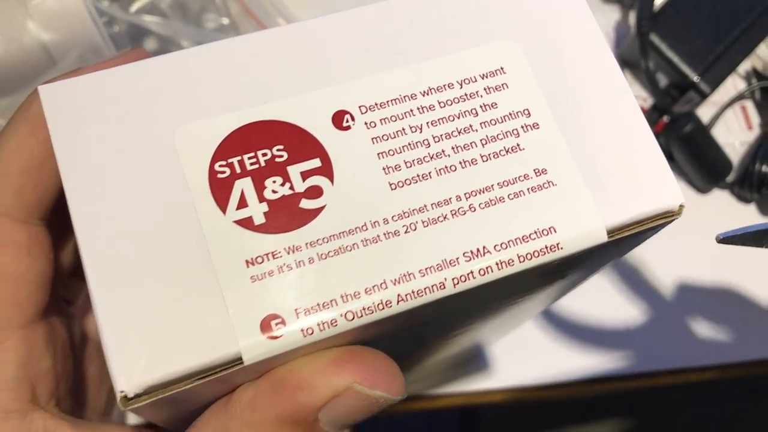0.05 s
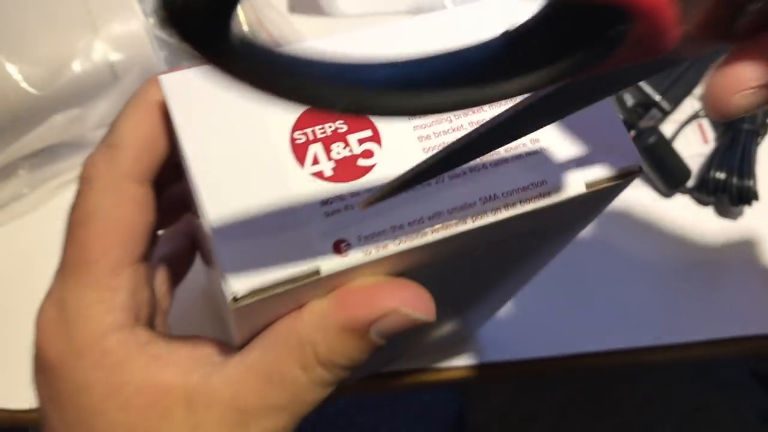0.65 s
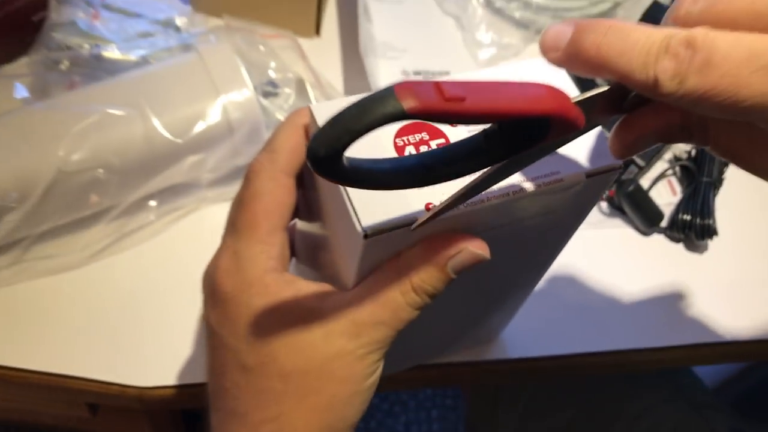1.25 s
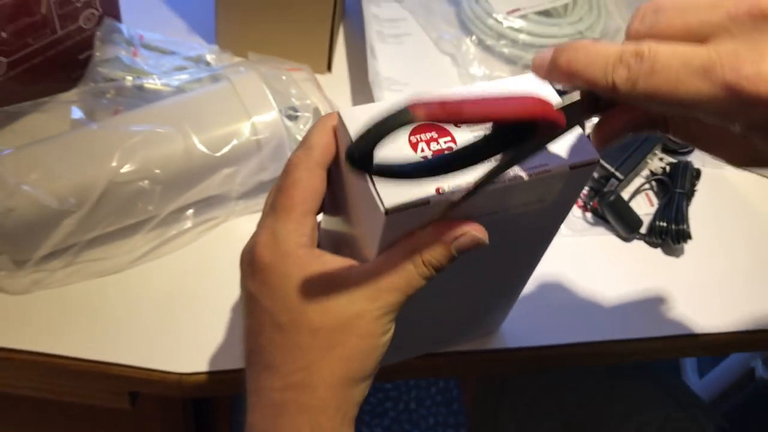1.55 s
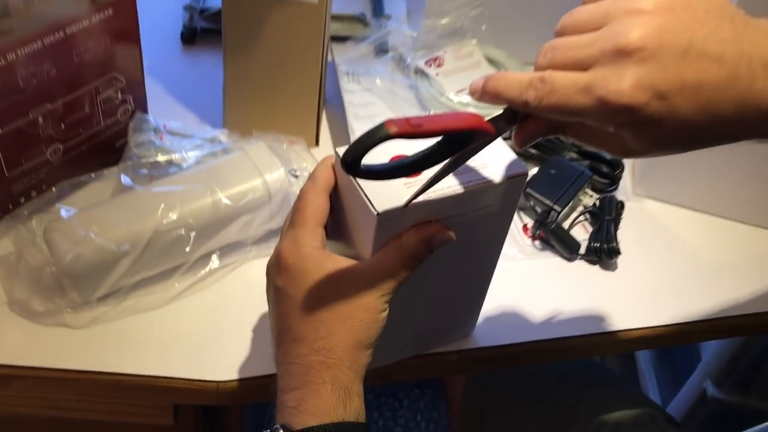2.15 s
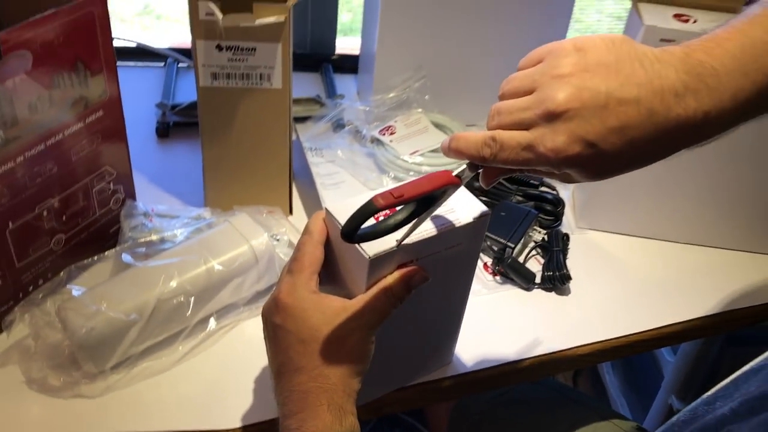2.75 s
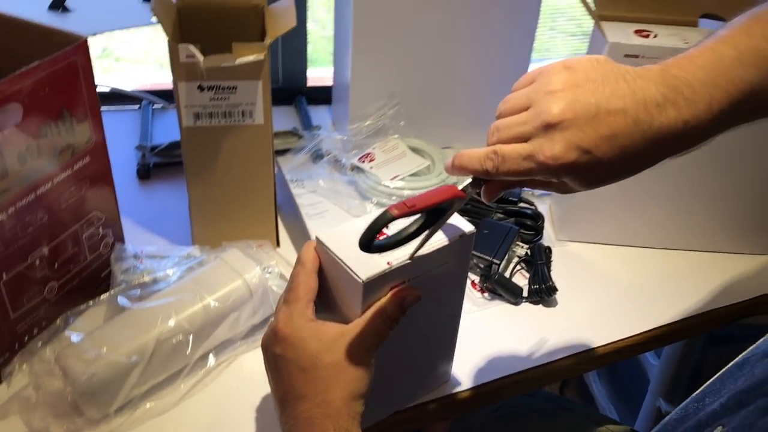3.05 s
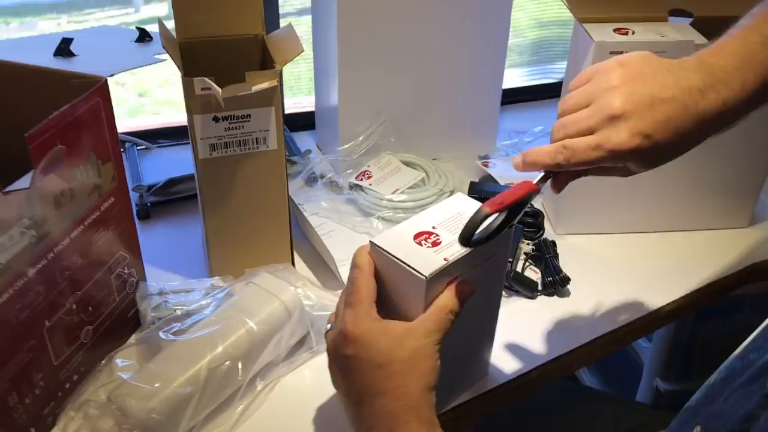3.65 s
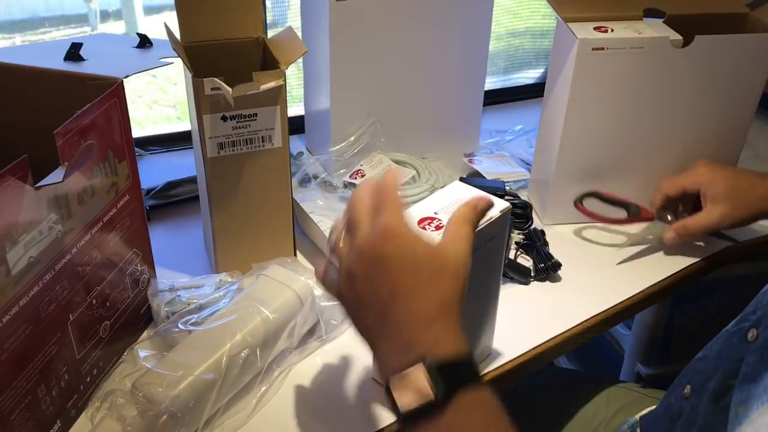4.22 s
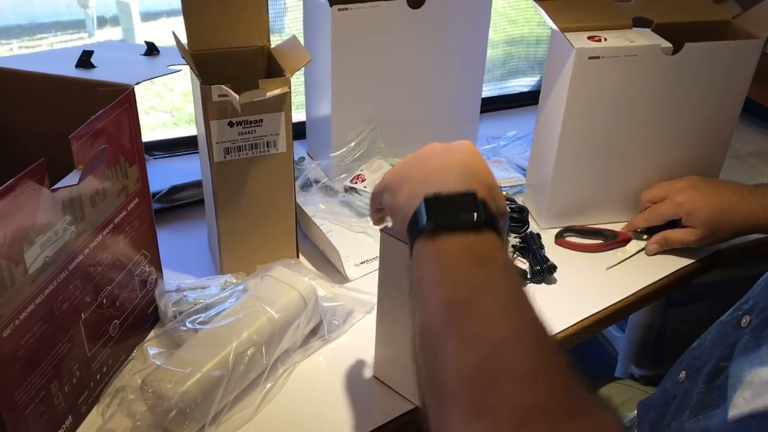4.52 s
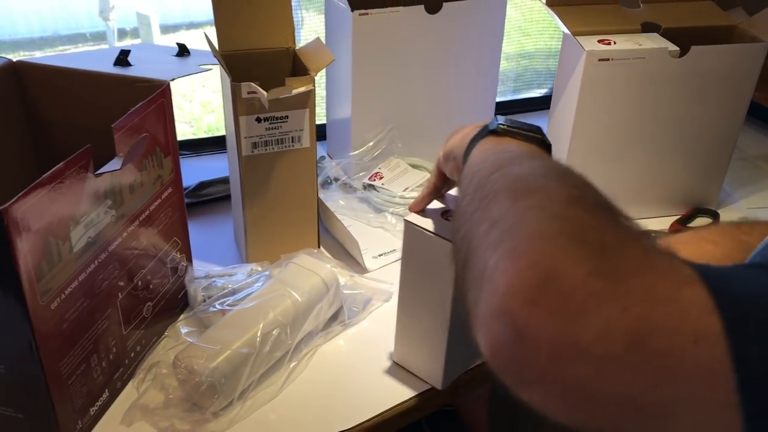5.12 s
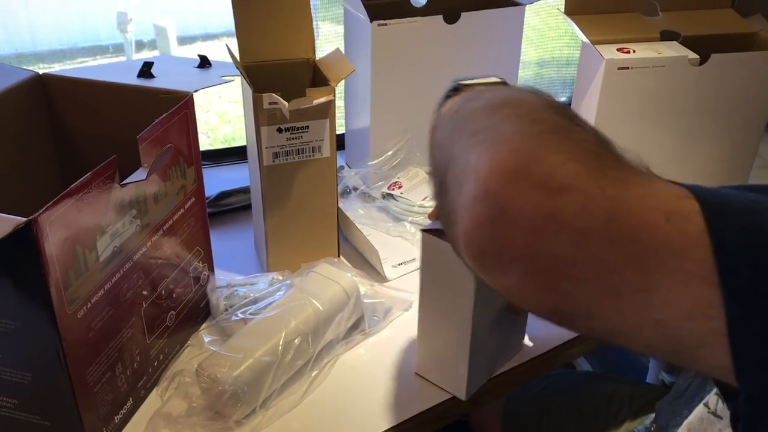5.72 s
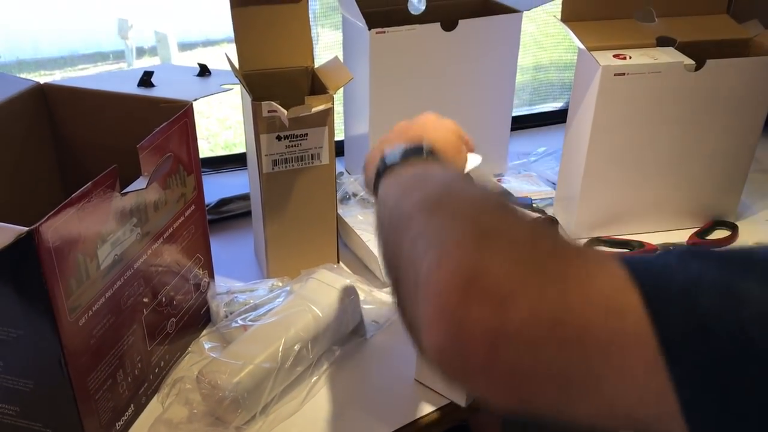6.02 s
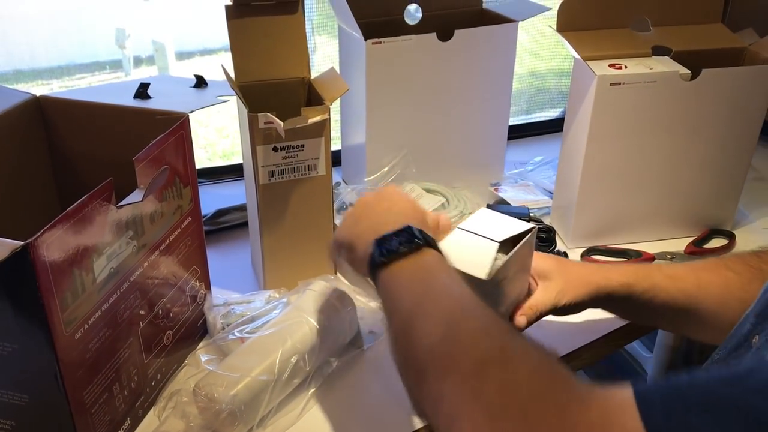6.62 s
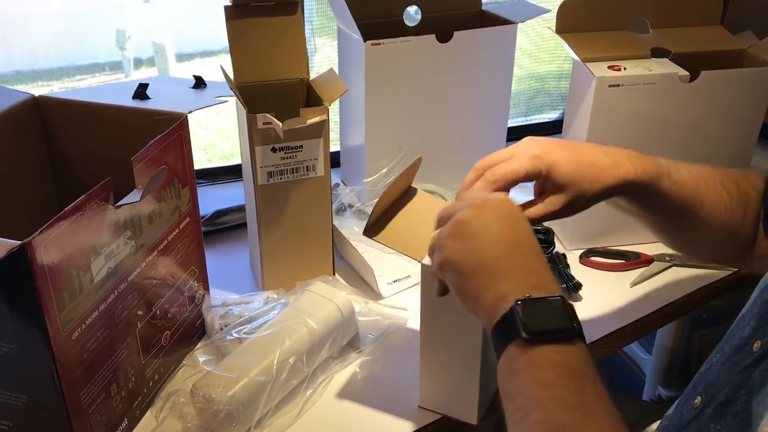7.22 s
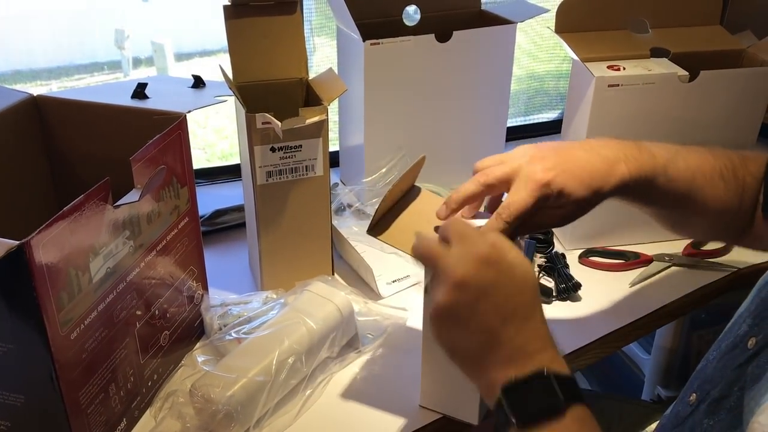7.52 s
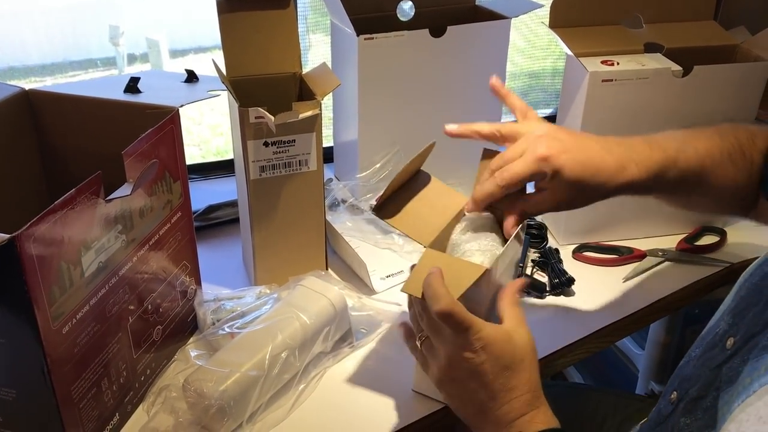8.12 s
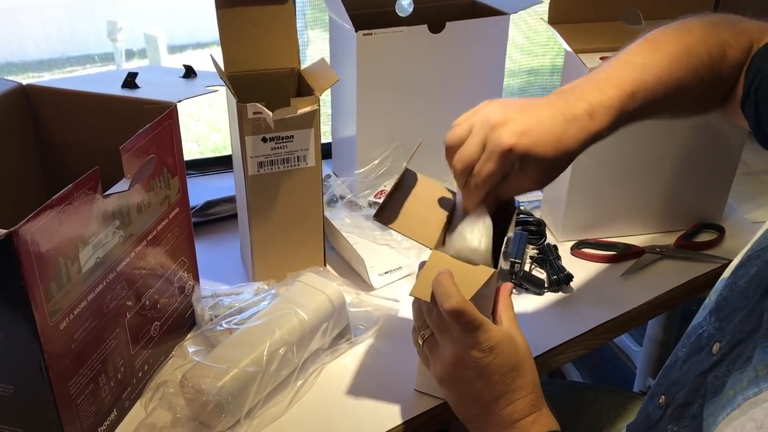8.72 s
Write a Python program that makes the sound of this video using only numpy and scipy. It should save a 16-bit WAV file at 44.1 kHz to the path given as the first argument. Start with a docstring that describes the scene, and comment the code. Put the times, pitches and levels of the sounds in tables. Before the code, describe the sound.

A blade scratches along a small carton, scissors clatter down, and hands tug the lid open and rustle a plastic bag.

```python
"""A desk in a small room with a low hum. A scissor blade is pushed through the seal of a small cardboard
box: it scrapes, sticks and slips, then breaks out. The scissors are laid down with a clack; the tuck
flap is dragged out and the lid pops free. Fingers rub and knock the carton and start to pull a plastic
bag from it. Friction is a stream of tiny grains coloured by the card or film; blows are damped modes
with a burst of noise."""
import sys
import numpy as np
from scipy import signal
from scipy.fft import rfft, irfft, next_fast_len
from scipy.io import wavfile
from scipy.ndimage import uniform_filter1d, map_coordinates

SR = 44100
rng = np.random.default_rng(int(sys.argv[2]) if len(sys.argv) > 2 else 0)


def output_pcm(signal):
    """Save a mono or channel-first signal as 16-bit PCM at the path in sys.argv[1].

    Samples are clipped to [-1, 1] before scaling.
    """
    pcm = np.clip(np.atleast_2d(signal).T, -1, 1) * 32767
    wavfile.write(sys.argv[1], SR, np.round(pcm).astype(np.int16))


N = 395329
TIME = np.arange(N) / SR
RING_TIME = TIME[:SR // 2]
THUD_TOP_HZ, RAP_TOP_HZ, TOP_HZ = 600, 3600, 16150


def amp(db):
    """Decibels to gain."""
    return 10 ** (np.asarray(db) / 20)


def unit(x):
    """x at unit rms."""
    return x / np.sqrt(np.mean(x ** 2) + 1e-20)


def unit_onset(x):
    """x at unit rms over its first 10 ms."""
    return x / np.sqrt(np.mean(x[:int(0.01 * SR)] ** 2))


def along(points, hz):
    """(frequency, value) points interpolated on a log frequency axis."""
    point_hz, values = np.transpose(points)
    return np.interp(np.log(hz + 1), np.log(point_hz + 1), values)


def wobble(rate_hz):
    """Smooth random curve, rate_hz knots a second."""
    return map_coordinates(rng.standard_normal(int(N * rate_hz / SR) + 4), [TIME * rate_hz])


def fade(t60_s):
    """Exponential decay, 60 dB in t60_s."""
    return np.exp(-np.log(1000) * RING_TIME / t60_s)


def add(track, start_s, sound):
    """Mix sound into track."""
    part = track[round(start_s * SR):][:len(sound)]
    part += sound[:len(part)]


def band(x, edges_hz, kind):
    """Causal low-, high- or band-pass."""
    return signal.sosfilt(signal.butter(4, edges_hz, kind, fs=SR, output="sos"), x)


def filtered(x, response):
    """x through a response given as a function of frequency."""
    size = next_fast_len(len(x) + SR // 4)
    return irfft(rfft(x, size) * response(np.fft.rfftfreq(size, 1 / SR)), size)[:len(x)]


def coloured(x, spectrum, size=2048):
    """x through a minimum-phase filter with the given spectrum."""
    gain = amp(along(spectrum, np.fft.rfftfreq(size, 1 / SR)))
    cepstrum = irfft(np.log(gain))
    cepstrum[1:size // 2] *= 2
    cepstrum[size // 2 + 1:] = 0
    return signal.fftconvolve(x, irfft(np.exp(rfft(cepstrum))))[:len(x)]


def resonant(x, peaks):
    """x through parallel resonances of alternating sign."""
    def response(f):
        return sum((-1) ** k * amp(db) * 1j * f * width_hz / (hz * hz - f * f + 1j * f * width_hz)
                   for k, (hz, width_hz, db) in enumerate(peaks))
    return filtered(x, response)


def gliding(x, hz, width_hz):
    """x through one resonance of moving pitch."""
    turn = np.exp(2j * np.pi * np.cumsum(hz) / SR)
    pole = np.exp(-np.pi * width_hz / SR)
    return np.real(turn * signal.lfilter([2 * (1 - pole)], [1, -pole], x / turn))


def shifting(x, depth_db, size=1024, frames=6):
    """The colour of the card wanders as the grip changes."""
    spectra = signal.stft(x, nperseg=size)[2]
    field = uniform_filter1d(rng.standard_normal(spectra.shape), size=3, axis=0)
    field = uniform_filter1d(field, size=frames, axis=1)
    return signal.istft(spectra * amp(depth_db * unit(field)), nperseg=size)[1][:N]


def levels(rows):
    """One gain curve per level column, silent outside the rows' time span."""
    times, *columns = np.transpose(rows)
    active = (TIME > times[0]) & (TIME < times[-1])
    return np.array([amp(np.interp(TIME, times, db)) for db in columns]) * active


def strokes(rows, attack_s, swell_db_per_s, release_s):
    """Rasp and hiss gains: a stroke bites, swells as it gathers speed, and dies away."""
    rasp, hiss = np.zeros(N), np.zeros(N)
    for start_s, length_s, rasp_db, hiss_db in rows:
        attack = np.minimum(RING_TIME / attack_s, 1)
        swell = amp(-swell_db_per_s * np.maximum(length_s - RING_TIME, 0))
        release = np.exp(-np.maximum(RING_TIME - length_s, 0) / release_s)
        shape = attack * swell * release
        add(rasp, start_s, amp(rasp_db) * shape)
        add(hiss, start_s, amp(hiss_db) * shape)
    return rasp, hiss


def ring(modes, detune, damping=1):
    """Damped modes; grip and point of contact scatter each one's pitch and level."""
    scatter = rng.standard_normal((len(modes), 2))
    out = np.zeros(len(RING_TIME))
    for (hz, db, t60_s), (offset_db, shift) in zip(modes, scatter):
        tone = np.sin(2 * np.pi * hz * (1 + detune * shift) * RING_TIME)
        out += amp(db + offset_db) * fade(t60_s / damping) * tone
    return out


def crack(t60_s, tail_db, tail_t60_s):
    """Contact noise: a sharp burst and a longer rattle."""
    return rng.standard_normal(len(RING_TIME)) * (fade(t60_s) + amp(tail_db) * fade(tail_t60_s))


def tick(spectrum, t60_s, tail_db, tail_t60_s):
    """The treble of a contact."""
    return unit_onset(coloured(crack(t60_s, tail_db, tail_t60_s), spectrum))


def ping(hz, width_share, t60_s):
    """A small contact that speaks in one resonance."""
    burst = rng.standard_normal(len(RING_TIME)) * fade(t60_s)
    peak = resonant(burst, [(hz, width_share * hz, 0)])
    return unit_onset(resonant(peak, [(hz, hz / 2, 0)]))  # steeper skirts


# friction treble: (frequency [Hz], relative level [dB])
HISS_SPECTRUM = [(2400, -25.5), (3900, 8.5), (5200, 7), (7000, 12.5), (10000, 15.5), (15500, 8)]


def rub(gains, body, grains_per_s, spread_db, judder_db, treble=HISS_SPECTRUM):
    """Friction: fibres catch and let go in tiny grains that hiss and drive the body filter."""
    rasp_gain, hiss_gain = gains
    caught = rng.random(N) < grains_per_s / SR
    grains = caught * rng.standard_normal(N)
    grains *= amp(spread_db * rng.standard_normal(N) + judder_db * wobble(160))
    rasp = band(body(grains), RAP_TOP_HZ, "low")
    rasp /= np.std(band(rasp, [THUD_TOP_HZ, RAP_TOP_HZ], "band"))
    hiss = coloured(grains, treble)
    hiss /= np.std(band(hiss, [RAP_TOP_HZ, TOP_HZ], "band"))
    return rasp * rasp_gain + hiss * hiss_gain


# room rumble: (frequency [Hz], relative level [dB])
AIR_SPECTRUM = [(20, 6), (65, -6), (140, -21.5), (290, -20.5), (450, -27.5), (950, -30.5), (3200, -49),
                (10000, -51), (16000, -53.5)]
# room hum: (frequency [Hz], level [dB])
HUM_TONES = [(56, -52.5), (292, -68.5), (578, -71.5)]


def background(air_db=-45.5, waver_db=2, drift_rad=0.55):
    """Low rumble and the slightly wavering hum of the room."""
    out = amp(air_db) * unit(coloured(rng.standard_normal(N), AIR_SPECTRUM))
    for hz, db in HUM_TONES:
        gain = amp(db + waver_db * wobble(4))
        out += gain * unit(np.sin(2 * np.pi * hz * TIME + drift_rad * wobble(4.6)))
    return out


# wall reverberation: (frequency [Hz], t60 [s])
ROOM_DECAY = [(1000, 0.26), (12000, 0.16)]


def room(x, early_db=-7, early_t60_s=0.031, late_db=-16, move_s=0.3):
    """Desk and boxes answer at once, the walls later; the echoes change as the hands move."""
    hop = int(move_s * SR)
    padded = np.pad(x, (hop, 2 * hop))
    window = np.sqrt(np.hanning(2 * hop))
    wet = np.zeros(len(padded) + SR)
    for start in range(0, N + hop, hop):
        hz, t, spectra = signal.stft(rng.standard_normal(SR // 2), SR, nperseg=256)
        decay = np.exp(-np.log(1000) * t / along(ROOM_DECAY, hz)[:, None])
        late = signal.istft(spectra * decay, SR)[1]
        early = rng.standard_normal(len(RING_TIME)) * fade(early_t60_s)
        echoes = np.zeros(SR // 2)
        add(echoes, 0.0015, amp(early_db) * early / np.linalg.norm(early))
        add(echoes, 0.009, amp(late_db) * late / np.linalg.norm(late))
        add(wet, start / SR, signal.fftconvolve(padded[start:start + 2 * hop] * window, echoes))
    return wet[hop:hop + N]


# bag sliding out: (time [s], rasp [dB], hiss [dB])
BAG_SLIDE = [(8.58, -67, -64), (8.72, -45.5, -45.5), (8.97, -43, -42)]
# plastic film: (frequency [Hz], relative level [dB])
FILM_SPECTRUM = [(150, -5.5), (480, -4.5), (700, 1.5), (2100, -0.5), (3600, -9.5)]
# folds snapping over: (time [s], frequency [Hz], level [dB])
FOLD_SNAPS = [(7.032, 9900, -49), (7.719, 5600, -50), (7.786, 7000, -62), (8.164, 9900, -52),
              (8.811, 9500, -43.5)]


def bag():
    """Thin plastic crinkles under the fingers, then rustles along the carton's inner walls."""
    out = rub(levels(BAG_SLIDE), lambda x: coloured(x, FILM_SPECTRUM),
              grains_per_s=15000, spread_db=1.5, judder_db=1)
    for time_s, hz, db in FOLD_SNAPS:
        add(out, time_s, amp(db) * ping(hz, width_share=0.5, t60_s=0.01))
    return out


# card on card: (time [s], centre pitch [Hz], level [dB])
CARD_SQUEAKS = [(7.66, 1190, -40), (8.112, 800, -42.5)]


def squeaks(length_s=0.03, rise_octaves=0.35, width_share=0.2):
    """Card catches on card and briefly sings in one narrow, rising resonance."""
    out = np.zeros(N)
    swell = np.hanning(int(length_s * SR))
    rise = 2 ** (rise_octaves * np.linspace(-0.5, 0.5, len(swell)))
    for time_s, hz, db in CARD_SQUEAKS:
        tone = gliding(rng.standard_normal(len(swell)), hz * rise, width_share * hz)
        add(out, time_s, amp(db) * swell * unit(tone))
    return out


# shut carton: (base frequency [Hz], relative level [dB], base t60 [s])
CARTON_MODES = [(199.6, -1, 0.14), (259, 7, 0.071), (361, 0.5, 0.11), (465, 3, 0.043), (720, 0, 0.028),
                (960, -1.5, 0.024), (1332, -2, 0.027), (2070, 6.5, 0.0084)]


def carton_blow(thud_db, rap_db, pitch, detune, damping, crunch, crunch_t60_s):
    """The box thuds, too small to radiate deep bass; its panels rap with a crunch of fibres."""
    modes = ring([(hz * pitch, db, t60_s) for hz, db, t60_s in CARTON_MODES], detune, damping)
    fibres = crunch * rng.standard_normal(len(RING_TIME)) * fade(crunch_t60_s)
    thud = band(band(modes, 160 * pitch, "high"), THUD_TOP_HZ, "low")
    rap = band(modes + fibres, [THUD_TOP_HZ, RAP_TOP_HZ], "band")
    return amp(thud_db) * unit_onset(thud) + amp(rap_db) * unit_onset(rap)


# blade and fingers on the carton: (time [s], thud [dB], rap [dB], pitch [ratio])
CARTON_KNOCKS = [(0.883, -40, -53.5, 1.11), (3.61, -40, -36, 1.01), (3.617, -26.5, -49, 0.79),
                 (3.632, -34, -63.5, 0.62), (4.529, -38.5, -63, 1.07), (5.485, -40, -59, 1.1),
                 (5.54, -37, -48, 0.97), (5.653, -36.5, -43, 0.63), (5.826, -36.5, -44, .7),
                 (6.039, -49, -40.5, 1.03), (6.759, -50, -51.5, 1.16), (7.01, -40, -51, 0.83),
                 (7.246, -40.5, -57.5, 0.67), (7.263, -46, -41, 1.03), (7.482, -37.5, -47, 0.69),
                 (8.095, -38.5, -61, .55), (8.118, -42, -45.5, .8), (8.199, -42, -43, 0.87),
                 (8.354, -43.5, -37, 1)]


def knocks(tick_re_rap_db=-11.5, boom_hz=104, boom_re_thud_db=-11, boom_t60_s=0.13):
    """Light blows: each lands on another panel, rings at other pitches and makes the desk boom."""
    out = np.zeros(N)
    for time_s, thud_db, rap_db, pitch in CARTON_KNOCKS:
        blow = carton_blow(thud_db, rap_db, pitch, detune=0.07, damping=1.6,
                           crunch=1.5, crunch_t60_s=0.035)
        click = tick(HISS_SPECTRUM, t60_s=0.0066, tail_db=-22.5, tail_t60_s=0.22)
        boom = ring([(boom_hz, thud_db + boom_re_thud_db, boom_t60_s)], detune=0.1)
        add(out, time_s, blow + amp(rap_db + tick_re_rap_db) * click + boom)
    return out


# rubbed card: (frequency [Hz], relative level [dB])
CARD_SPECTRUM = [(70, -15.5), (220, 3.5), (450, 1.5), (700, 5), (1150, -1.5), (1550, -3), (3600, -9)]
# fingers on card: (start [s], length [s], rasp [dB], hiss [dB])
FINGER_SCUFFS = [(5.41, 0.058, -43.5, -48.5), (5.568, 0.0064, -37, -38.5), (5.62, 0.087, -44, -51),
                 (5.835, 0.057, -49.5, -47), (5.963, 0.011, -45.5, -42.5), (6.09, .05, -52, -56),
                 (6.67, 0.049, -54, -54.5), (7.1, 0.055, -52, -61.5), (7.21, 0.028, -56, -64),
                 (7.535, 0.018, -51, -55), (7.86, 0.03, -55.5, -55.5), (7.965, 0.084, -48, -48.5),
                 (8.11, 0.021, -63, -52), (8.345, 0.026, -45, -48), (8.37, 0.13, -72, -54),
                 (8.505, 0.025, -48.5, -48)]
# shifting grip: (time [s], base level [dB])
GRIP_LEVELS = [(4.2, -69), (4.57, -52), (4.96, -63), (5.19, -58.5), (5.68, -49.5), (6.09, -59),
               (6.6, -50.5), (6.79, -75.5), (7.36, -59), (8.6, -54)]


def hands(skid_s=0.024, skid_rasp_re_rap_db=-10, skid_hiss_re_rap_db=-17, grip_waver_db=4.24):
    """Skin scuffs the card and skids into each knock, with faint uneven rubbing in between."""
    scuffs = strokes(FINGER_SCUFFS, attack_s=0.012, swell_db_per_s=44, release_s=0.018)
    lead_ins = [(time_s - skid_s, skid_s, rap_db + skid_rasp_re_rap_db, rap_db + skid_hiss_re_rap_db)
                for time_s, _, rap_db, _ in CARTON_KNOCKS]
    skids = strokes(lead_ins, attack_s=0.015, swell_db_per_s=199, release_s=0.012)
    grip = levels(GRIP_LEVELS) * amp([[-2.5], [-12]])  # rasp, hiss
    grip *= amp(grip_waver_db * wobble(25))
    gains = np.linalg.norm([scuffs, skids, grip], axis=0)
    hollow = lambda x: shifting(coloured(x, CARD_SPECTRUM), depth_db=3.2)
    rubbing = rub(gains, hollow, grains_per_s=7000, spread_db=1.5, judder_db=2)
    return shifting(rubbing, depth_db=2, size=64, frames=120)


# tugs on the flap: (start [s], length [s], rasp [dB], hiss [dB])
FLAP_TUGS = [(5.652, 0.044, -30, -36), (5.698, 0.052, -34.5, -52), (5.752, 0.022, -28, -37),
             (5.775, 0.023, -27, -28.5), (5.821, 0.0063, -28.5, -35)]
# steady flap resonances: (frequency [Hz], width [Hz], relative level [dB])
FLAP_PEAKS = [(156, 340, -11), (668, 74, -5), (2030, 270, -5.5)]
# main flap resonance: (time [s], frequency [Hz])
GROAN_PITCH = [(5.655, 1100), (5.68, 1060), (5.7, 1040), (5.76, 950), (5.778, 1030), (5.8, 1050),
               (5.825, 900)]
# flap treble: (frequency [Hz], relative level [dB])
FLAP_HISS = [(2300, -26.5), (2800, 21), (3400, -10.5), (4200, 3.5), (5400, 2.5), (10000, 7.5), (15500, -1)]


def flap(groan_width_hz=133, groan_gain_db=2):
    """The tuck flap groans out of its slot in tugs, its pitch wandering as it bends."""
    tugs = strokes(FLAP_TUGS, attack_s=0.0035, swell_db_per_s=14, release_s=0.0053)
    groan_hz = np.interp(TIME, *np.transpose(GROAN_PITCH))
    def bending(x):
        return resonant(x, FLAP_PEAKS) + amp(groan_gain_db) * gliding(x, groan_hz, groan_width_hz)
    return rub(tugs, bending, grains_per_s=5000, spread_db=1, judder_db=0.5, treble=FLAP_HISS)


# lid on the rim: (time [s], rasp [dB], hiss [dB])
LID_SCRAPE = [(6.521, -41, -51), (6.536, -41, -46), (6.541, -27, -32), (6.551, -23.5, -18),
              (6.559, -37, -35), (6.6, -55, -54)]
# lid treble: (frequency [Hz], relative level [dB])
LID_HISS = [(2300, -22.5), (3200, -3), (5300, -9), (7500, 0), (10200, 5.5), (12000, -1), (15500, -9.5)]
# freed lid and open box: (frequency [Hz], relative level [dB], t60 [s])
LID_MODES = [(201, -8, 0.096), (536, 1, 0.074), (716, -8, 0.09), (1230, 0, 0.044)]


def lid(low_cut_hz=380, free_s=6.5405, pop_db=-26.5):
    """The lid's stiff edge, radiating little bass, scrapes past the rim and pops free."""
    edge = lambda x: band(coloured(x, CARD_SPECTRUM), low_cut_hz, "high")
    out = rub(levels(LID_SCRAPE), edge, grains_per_s=10000, spread_db=2.5, judder_db=0.5,
              treble=LID_HISS)
    add(out, free_s, amp(pop_db) * unit_onset(ring(LID_MODES, detune=0.005)))
    return out


# scissor contacts: (time [s], clack [dB], tick [dB], ping frequency [Hz], ping [dB])
SCISSOR_HITS = [(0.317, -63, -65.5, 2600, -72), (1.29, -62, -63.5, 2260, -60.5),
                (2.25, -60.5, -72, 4230, -58), (3.592, -39, -36, 2200, -31.5),
                (4.2875, -57.5, -51.5, 7650, -51.5), (4.3088, -56, -47.5, 3430, -46.5),
                (4.339, -46, -61, 2220, -48.5), (4.3495, -38.5, -41.5, 11600, -46),
                (4.3766, -45.5, -42, 5370, -46), (4.407, -37.5, -49, 2040, -43.5),
                (4.504, -61.5, -55, 13800, -53.5), (4.5923, -20.5, -27, 2850, -27),
                (4.624, -28.5, -31.5, 3550, -35.5), (4.64, -30, -35, 1100, -31),
                (4.728, -39, -53.5, 910, -41.5)]
# scissors on the desk: (frequency [Hz], relative level [dB], base t60 [s])
DESK_MODES = [(88, 4, 0.084), (542, -9, 0.24), (862, -4, 0.16), (1055, -0.5, 0.081), (1327, 11.5, 0.029),
              (2030, -7, 0.037), (2820, 1, 0.014)]
# steel blades: (frequency [Hz], level re clack [dB], t60 [s])
BLADE_MODES = [(1640, -31, .7), (2820, -31, .7), (2970, -35, .85), (3050, -34, .9), (3780, -41, .7)]
# contact treble: (frequency [Hz], relative level [dB])
TICK_SPECTRUM = [(2200, -25.5), (3800, 6.5), (7700, 0), (10500, 5), (15500, -1.5)]


def scissors():
    """The scissors click on the box, snap out of the seal and bounce on the desk; the blades ring on."""
    out = np.zeros(N)
    for time_s, clack_db, tick_db, ping_hz, ping_db in SCISSOR_HITS:
        rattle_db = 0.5 * clack_db + 13  # only hard blows rattle the loose joint
        desk = ring(DESK_MODES, detune=0.058, damping=1.05)
        contact = band(5 * crack(t60_s=0.0041, tail_db=rattle_db, tail_t60_s=0.15), RAP_TOP_HZ, "low")
        steel = ring(BLADE_MODES, detune=0.004)
        click = tick(TICK_SPECTRUM, t60_s=0.0039, tail_db=rattle_db - 5.5, tail_t60_s=0.097)
        add(out, time_s, amp(clack_db) * (unit_onset(desk + contact) + steel))
        add(out, time_s, amp(tick_db) * click)
        add(out, time_s, amp(ping_db) * ping(ping_hz, width_share=0.14, t60_s=0.0035))
    return out


# pushes along the seam: (start [s], length [s], rasp [dB], hiss [dB])
BLADE_PUSHES = [(1.45, 0.062, -50, -58.5), (1.575, 0.064, -49, -56.5), (2.925, 0.061, -50, -58),
                (3.02, 0.089, -49, -53.5), (3.15, 0.064, -53, -58), (3.40, 0.14, -45, -50.5),
                (3.555, 0.041, -39, -38.5), (3.72, 0.12, -51.5, -52), (3.935, 0.02, -52, -58.5),
                (3.99, 0.078, -54, -62)]
# blade resting on the seam: (time [s], rasp [dB], hiss [dB])
BLADE_REST = [(0.2, -76, -78), (0.52, -67, -75.5), (0.85, -81, -88), (2.3, -73.5, -82), (2.8, -66.5, -68.5),
              (3.9, -71, -81), (4.25, -70, -69)]
# scraped seam: (frequency [Hz], relative level [dB])
SEAM_SPECTRUM = [(70, -32), (170, -3.5), (450, -1.5), (620, -5.5), (1550, -12), (2200, -13.5), (3600, -22)]


def blade_scrape():
    """The blade scrapes along the seam and scratches faintly between pushes."""
    pushes = strokes(BLADE_PUSHES, attack_s=0.0073, swell_db_per_s=131, release_s=0.014)
    seam = lambda x: coloured(x, SEAM_SPECTRUM)
    scrape = rub(pushes, seam, grains_per_s=6000, spread_db=1, judder_db=2)
    scratch = rub(levels(BLADE_REST), seam, grains_per_s=700, spread_db=4, judder_db=2)
    return scrape + scratch


# stick-slip runs: (start [s], length [s], nominal gap [s], thud [dB], rap [dB])
SLIP_RUNS = [(1.51, 0.01, .013, -39, -48.5), (1.558, 0.021, 0.024, -43, -50.5),
             (1.596, 0.025, 0.014, -42, -54), (2.39, 0.048, .015, -50, -53.5),
             (2.465, 0.029, 0.031, -44, -50.5), (2.509, .056, .0112, -40, -47),
             (2.619, 0.025, 0.0049, -39, -51), (2.725, .031, 0.0055, -39, -48.5)]


def blade_slips(jitter_share=0.04, scatter_db=2.5, tick_re_rap_db=-8):
    """The blade sticks and slips in the seal; each slip is a dry tick that jerks the carton."""
    out = np.zeros(N)
    for start_s, length_s, gap_s, thud_db, rap_db in SLIP_RUNS:
        for due_s in np.linspace(start_s, start_s + length_s, round(length_s / gap_s) + 1):
            time_s = due_s + jitter_share * gap_s * rng.standard_normal()
            gain = amp(scatter_db * rng.standard_normal())
            jerk = carton_blow(thud_db, rap_db, pitch=0.96, detune=0.023, damping=1,
                               crunch=1.25, crunch_t60_s=0.03)
            click = tick(HISS_SPECTRUM, t60_s=0.0074, tail_db=-19, tail_t60_s=0.03)
            add(out, time_s, gain * (jerk + amp(rap_db + tick_re_rap_db) * click))
    return out


def scene():
    """Close handling, its echoes and the room's background."""
    cutting = blade_scrape() + blade_slips()
    near = cutting + knocks() + scissors() + flap() + lid() + hands() + squeaks() + bag()
    return (near + room(near) + background())[None]


def record(dry):
    """Brick-wall low-pass at TOP_HZ."""
    return filtered(dry[0], lambda hz: hz < TOP_HZ)[None]


dry = scene()
out = record(dry)
output_pcm(out)
```